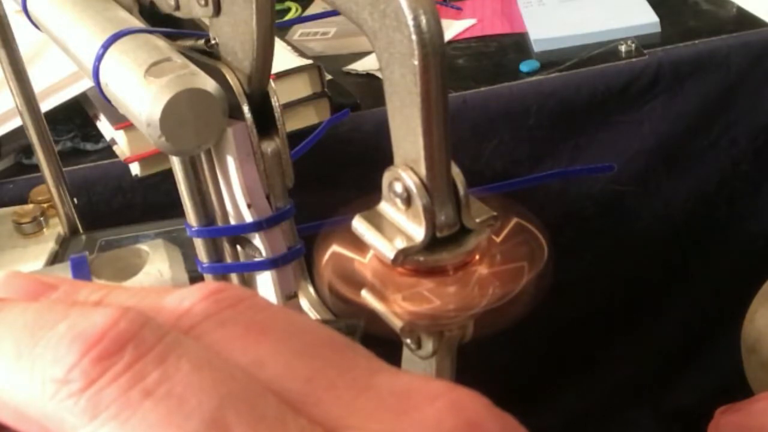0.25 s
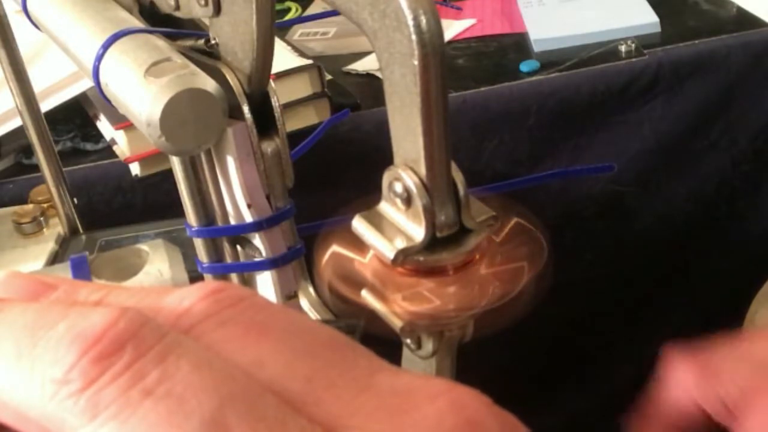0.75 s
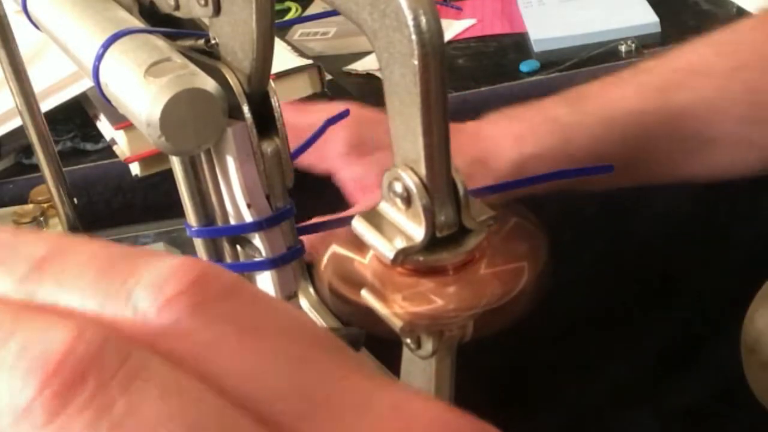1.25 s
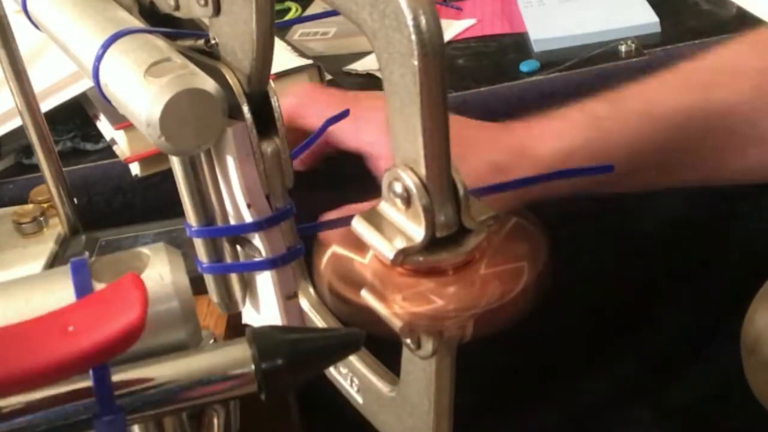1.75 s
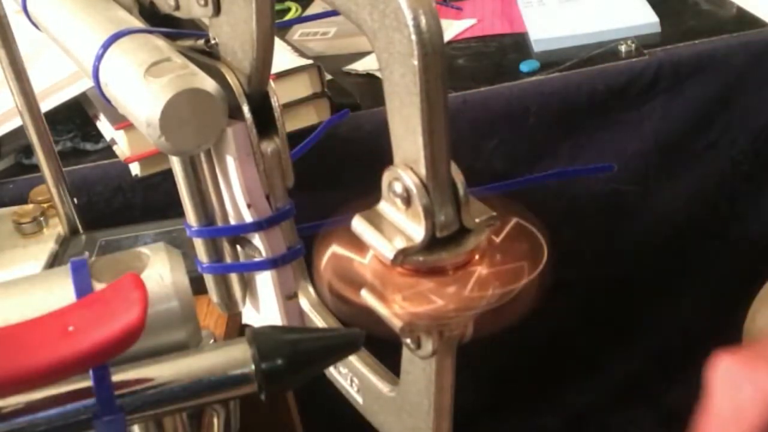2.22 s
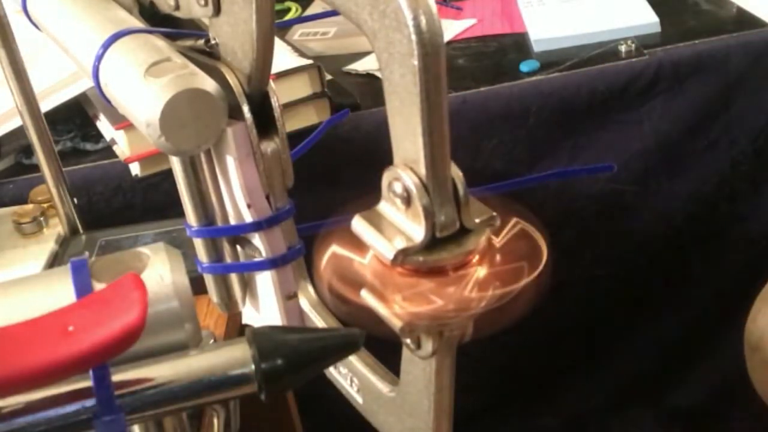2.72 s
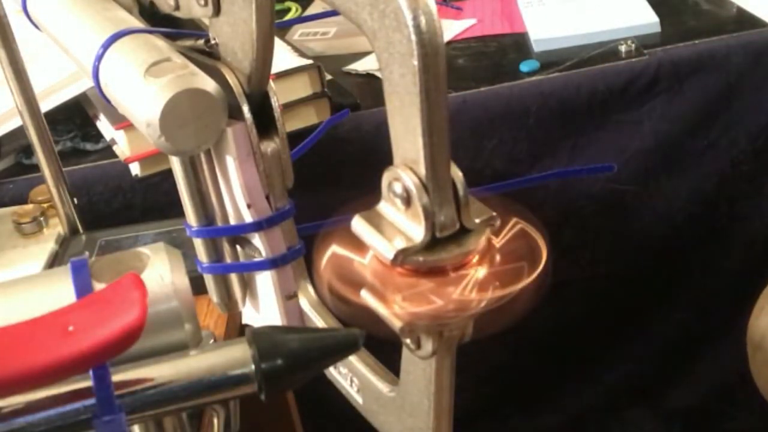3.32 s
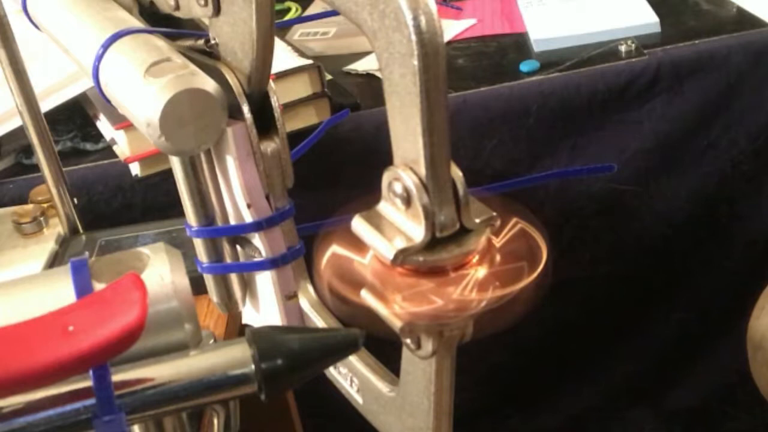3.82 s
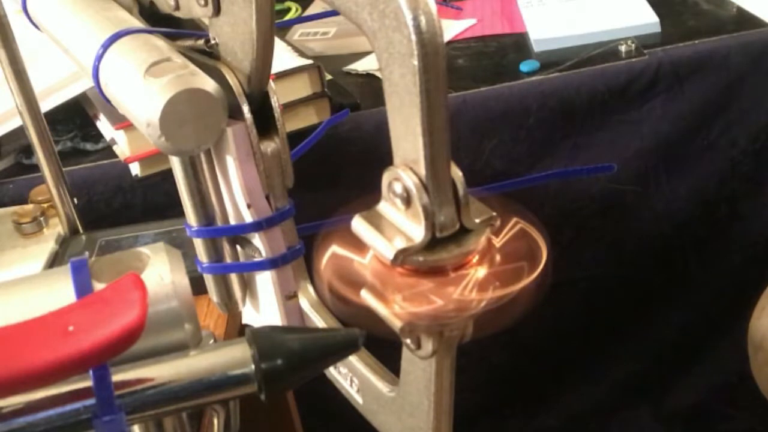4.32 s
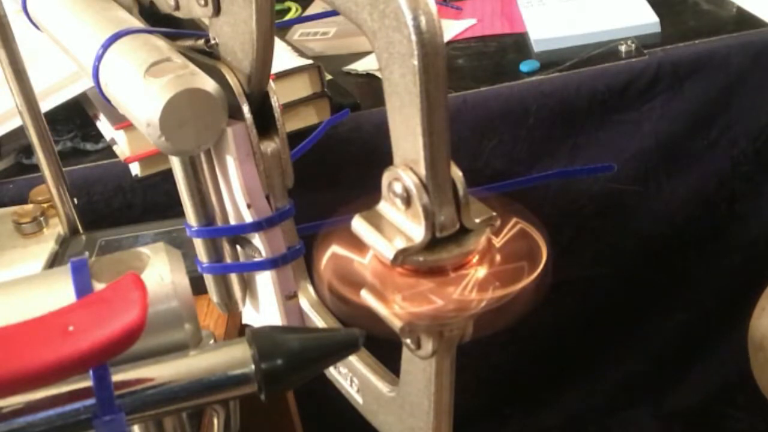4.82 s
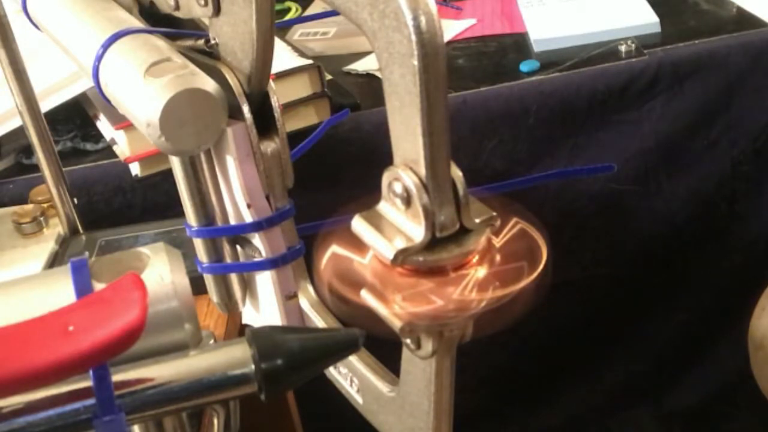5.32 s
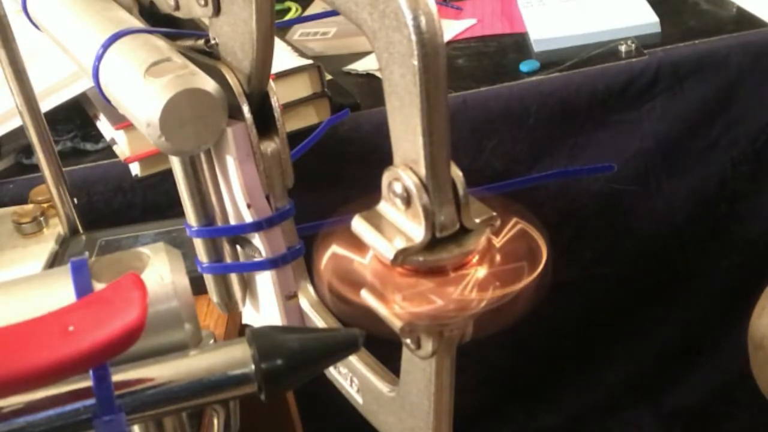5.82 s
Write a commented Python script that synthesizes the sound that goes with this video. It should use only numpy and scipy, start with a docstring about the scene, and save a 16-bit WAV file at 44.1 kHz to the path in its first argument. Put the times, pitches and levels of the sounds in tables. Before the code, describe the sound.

A compressed-air jet roars and buzzes against a small metal spinner, cuts off with a click, and the spinner coasts on humming with thin bearing whistles.

```python
"""A small furnished room: an air gun blows on a two-lobed metal spinner in a clamp, then shuts off; it coasts on.
The lobes chop the jet into a rising buzz over puffing hiss; gusts of spent air thump the microphone.
Coasting, the lobes hum and stir the air, and the ten-ball bearing sings thin falling whistles, squeals and
chatters. Two trigger ticks and a soft low drone follow the jet. The recorder's gain control ducks under
the jet and climbs back when it stops."""
import sys
import numpy as np
from scipy import signal
from scipy.fft import rfft, irfft, next_fast_len
from scipy.io import wavfile
from scipy.ndimage import uniform_filter1d

SR = 44100
rng = np.random.default_rng(int(sys.argv[2]) if len(sys.argv) > 2 else 0)


def wav_out(sig):
    """Save sig, one row per channel (or a flat mono array), as 16-bit PCM at SR to the path in sys.argv[1]."""
    wavfile.write(sys.argv[1], SR, np.round(np.clip(np.atleast_2d(sig).T, -1, 1) * 32767).astype(np.int16))


def linear_from_db(decibels):
    """Turn decibels (scalar or array-like) into linear amplitude factors; 0 gives 1."""
    return 10 ** (np.asarray(decibels, float) / 20)


N = 267246
T = np.arange(N) / SR
TOP_S = 1.18  # moment of top speed


def walk(rate):
    """Random levels held 1 / rate s and slewed twice; spread near 1."""
    hold = int(SR / rate)
    steps = np.repeat(rng.standard_normal(N // hold + 1), hold)
    return np.sqrt(2) * uniform_filter1d(uniform_filter1d(steps, hold), hold)[:N]


def noise(colour, flicker_db, rate):
    """Coloured noise of rms 1 in octave bands whose levels flicker alone."""
    size = next_fast_len(N)
    octave = np.log2(np.maximum(np.fft.rfftfreq(size, 1 / SR), 1))
    hz, db = np.transpose(colour)
    shape_db = np.interp(octave, np.log2(hz), db, left=-80, right=-60)
    spectrum = rfft(rng.standard_normal(size)) * linear_from_db(shape_db)
    out = np.zeros(N)
    for centre in range(int(np.log2(hz[0])), int(np.log2(hz[-1])) + 2):
        band = irfft(spectrum * np.clip(1 - abs(octave - centre), 0, 1), size)[:N]
        out += band * linear_from_db(flicker_db * walk(rate))
    return out / np.std(out)


def room(dry, t60_s, wet_db):
    """A small furnished room: a short tail, duller than the source."""
    t = T[:SR // 2]
    dull = signal.lfilter([1], [1, -.6], rng.standard_normal(len(t)))
    tail = dull * np.exp(-np.log(1000) * t / t60_s) * (t > .004)
    return dry + linear_from_db(wet_db) * signal.fftconvolve(dry, tail / np.linalg.norm(tail))[:N]


def spin():
    """Lobe rate in Hz: the jet drives it up steadily, then drag takes a share each second, a little more at first."""
    start_hz, gain_hz_per_s = 251.3, 20.07
    drag_per_s, early_loss_hz, early_s = .0202, .8, .28
    after = np.maximum(T - TOP_S, 0)
    driven = start_hz + gain_hz_per_s * np.minimum(T, TOP_S)
    return driven * np.exp(-drag_per_s * after) - early_loss_hz * (1 - np.exp(-after / early_s))


def fading(layer):
    """Level in dB of a coasting layer: a slow drift, and one short step about two seconds into the coast."""
    # Each row, by layer: level in dB at top speed, step in dB, drift in dB per s.
    # The step goes down for hum, air, rumble and chatter, up for octave and rustle.
    layers = {"hum": (-45, -2.7, -0.23), "octave": (-69.5, 2.6, -.1), "air": (-57.5, -0.38, -0.77),
              "rustle": (-69.5, .3, -0.84), "rumble": (-61.5, -6.5, -0.45), "chatter": (-74, -10, .3)}
    # The step: its middle in s, its length in s.
    step_time = (3.08, .08)
    db, step_db, drift_db = layers[layer]
    s, length = step_time
    return db + step_db * np.clip((T - s) / length + .5, 0, 1) + drift_db * (T - TOP_S)


def drone():
    """A soft low tone that holds a moment and dies."""
    # The tone: pitch in Hz, peak level in dB, start in s, end in s.
    tone = (111.5, -54, 1.47, 1.92)
    hz, db, start, end = tone
    envelope = np.clip(np.minimum((T - start) / .05, (end - T) / 0.18), 0, 1)
    return linear_from_db(db) * envelope * np.sin(2 * np.pi * hz * T)


def trigger():
    """The trigger snaps back in two dry ticks after the air stops: each a crack and a short ring."""
    # Each row: start in s, level in dB.
    clicks = [(1.298, -46), (1.308, -37)]
    # Ringing modes of the trigger. Each row: pitch in Hz, relative level in dB, t60 in s.
    modes = [(2500, 2, 0.013), (4200, 0, .006), (5800, -1.5, .006)]
    t = T[:SR // 40]
    ring = sum(linear_from_db(db) * np.sin(2 * np.pi * hz * t) * np.exp(-np.log(1000) * t / t60) for hz, db, t60 in modes)
    out = np.zeros(N)
    for s, db in clicks:
        crack = np.diff(uniform_filter1d(rng.standard_normal(len(t) + 1), size=3)) * np.exp(-t / 0.0011)
        start = int(s * SR)
        out[start:start + len(t)] += linear_from_db(db) * (0.99 * crack - ring / abs(ring).max())
    return out


def gusts():
    """Each gust of spent air shoves the microphone in, lets it swing back, and flutters roughly on it meanwhile."""
    # Each row: centre in s, level in dB, thump pitch in Hz.
    thumps = [(.27, -18.5, 96), (0.358, -20, 65), (0.652, -14.5, 94), (0.692, -16.5, 110), (.72, -19, 67),
              (.79, -24, 75), (0.926, -18.5, 55), (1.105, -13.5, 79.4)]
    flutter = noise([(60, -29), (200, 6), (500, -5), (1200, -27)], 0, 25)
    out = np.zeros(N)
    for s, db, hz in thumps:
        swing = linear_from_db(-5.5) * flutter - np.sin(2 * np.pi * hz * (T - s))
        out += linear_from_db(db) * swing * np.exp(-(1.57 * hz * (T - s)) ** 2)
    return out


def coast(turn):
    """The lobes push air at their passing rate and leave turbulence; the bearing rustles; the clamp rumbles."""
    # Noise colours of the eddies, rustle and rumble. Each row: frequency in Hz, relative level in dB per Hz.
    air_colour = [(60, -19), (150, 3), (300, 5), (550, 1.5), (950, 0.5), (1500, -4.5), (2200, -10),
                  (3300, -15.5), (5000, -39), (9000, -48)]
    rustle_colour = [(2000, -24), (4000, 3), (5000, -5), (6200, -2.5), (8700, -8), (10500, -10.5),
                     (11500, -6.5), (15700, -11)]
    rumble_colour = [(25, -13), (50, -9), (90, -1.5), (130, -7), (200, -12.5), (300, -4)]
    hum = linear_from_db(fading("hum") + 0.5 * walk(25.29)) * np.cos(turn + 0.07 * walk(30))
    octave_db = fading("octave")
    upper = np.zeros(N)
    for k, db in enumerate((0.0, -10.5, -11.0, -13.0), 2):  # harmonics 2 to 5 of the lobe rate
        upper += linear_from_db(octave_db + db + 1.8 * walk(15)) * np.cos(k * turn + 1.54)
    eddies = linear_from_db(fading("air") + 0.85 * walk(150)) * noise(air_colour, 0.32, 14)
    rustle = linear_from_db(fading("rustle")) * noise(rustle_colour, 1.7, 5.32)
    rumble = linear_from_db(fading("rumble")) * noise(rumble_colour, 1.8, 8.8)
    return np.sqrt(2) * (hum + upper) + eddies + rustle + rumble


def bearing(turn, lobe_hz):
    """Ten balls on wavy races sing one cage turn above and below each multiple of the ball rate, squeal and chatter."""
    # Resonances of spinner and clamp that a whistle swells through as it falls.
    # Each row: centre in Hz, width in Hz, basic whistle level at the centre in dB rms.
    resonances = [(2140, 43, -78.5), (2415, 130, -83), (2880, 46, -82), (3085, 54, -80), (3813, 134, -80),
                  (4062, 73, -76.5), (4385, 63, -84), (4490, 110, -82), (5270, 110, -83), (5900, 150, -84),
                  (6108, 93, -74), (6360, 100, -78.5), (11170, 140, -81), (11550, 210, -81),
                  (11930, 90, -83), (12110, 90, -83), (12290, 90, -86), (12500, 90, -83), (12770, 140, -80),
                  (13400, 110, -82), (13600, 160, -81), (14840, 150, -85)]
    # Whistles stronger or weaker than the rest: multiple of cage rate, with its offset in dB.
    waviness = {39: 2., 41: -5, 61: -4., 79: 3, 81: -3.5, 139: -6, 149: -1, 169: -5, 179: -7, 191: -3}
    # Squeals, a tone with a partner one lobe rate below and above. Each row: centre in s, length in s,
    # multiple of cage rate, then basic levels in dB rms of the tone below, the centre and the tone above.
    squeals = [(2.19, .22, 141.44, -72, -84, -70), (4.26, .47, 100, -77, -76, -74),
               (5.57, .2, 151.55, -79, -88, -82)]
    # Bursts of ball chatter. Each row: centre in s, rise above the rest in dB, length in s.
    bursts = [(1.56, 4.5, 0.091), (1.866, 6.5, .05), (2.16, 4.5, 0.12)]
    # Chatter colour. Each row: frequency in Hz, relative level in dB per Hz.
    chatter_colour = [(7000, -18), (10500, -13), (11200, 0), (12800, -4), (14000, -15), (15700, -9)]
    cage_per_lobe = .2956  # cage turns per lobe passing
    cage = cage_per_lobe * turn
    step = 256  # samples between whistle level updates
    waver = np.array([walk(20) for _ in range(4)])
    wander = iter(np.array_split(walk(6 * step), step))
    hz, width, db = np.transpose(resonances)[:, :, None]
    out = np.zeros(N)
    for ball in range(30, 210, 10):
        for side in (-1, 0, 1):
            multiple = ball + side
            line_hz = multiple * cage_per_lobe * lobe_hz[::step]
            swell = np.sum(np.sqrt(2) * linear_from_db(db) / (1 + (2 * (line_hz - hz) / width) ** 2) ** 2, axis=0)
            # faint and wandering between resonances, weaker on the ball multiples themselves
            faint = np.resize(linear_from_db(-93.5 + 5.4 * next(wander)), len(swell))
            size = swell * linear_from_db(waviness.get(multiple, 0) + 2.5 * waver[side, ::step]) + faint
            size = np.interp(T, T[::step], size * linear_from_db(-8 * (side == 0)))
            out += size * np.cos(multiple * cage + 0.67 * waver[side + 1])
    for s, length, multiple, *levels in squeals:
        tones = np.zeros(N)
        for side, level in enumerate(levels, -1):
            tones += linear_from_db(level) * np.cos(multiple * cage + side * turn + .4 * waver[side])
        envelope = np.exp(-abs(1.6 * (T - s) / length) ** 1.8)
        out += np.sqrt(2) * tones * linear_from_db(1.7 * waver[2]) * envelope
    # the load meets the balls once a cage turn against the fixed race, and once against the spinning one
    throb = linear_from_db(3 * np.cos(cage) + 1.2 * np.cos(2 * cage) + 1.5 * np.cos(turn / 2 - cage))
    bursts_db = sum(rise * np.exp(-((T - s) / length) ** 2) for s, rise, length in bursts)
    chatter = linear_from_db(fading("chatter") + bursts_db) * noise(chatter_colour, 1.2, 15) * throb
    return out * throb ** 0.19 + chatter


def jet(turn):
    """Each passing lobe cuts the jet: a buzz on the lobe rate and hiss that puffs once a lobe."""
    # Noise colours of the hiss and the low buffeting. Each row: frequency in Hz, relative level in dB per Hz.
    hiss_colour = [(150, -21.5), (400, -26), (900, -20), (2000, -21.5), (3100, -17.5), (5000, -18.5),
                   (7500, -19.5), (9500, -14.5), (10500, -19), (12500, -14), (15700, -16)]
    buffet_colour = [(25, -17), (60, 2.5), (120, -4.5), (250, -8.5), (500, -15), (1000, -50)]
    # Harmonics of the buzz. Each row: multiple of lobe rate, relative level in dB.
    harmonics = [(1, 5.5), (2, 0.5), (3, -1), (4, 3), (5, -12), (6, -0.5), (7, -3.5), (9, -8), (10, -22),
                 (11, -11), (12, -8)]
    # valve: moment it starts to close, time to lose the first dB
    shut_s, close_s = 1.162, 0.0074
    wobble = .03 * walk(80)
    buzz = np.zeros(N)
    for k, db in harmonics:
        buzz += linear_from_db(db + 1.87 * walk(24.64)) * np.cos(round(k) * (turn + wobble) + 0.1992 * k * k)
    puff = 1 + .25 * np.cos(turn + .3) + .07 * np.cos(2 * turn)
    hiss = noise(hiss_colour, 0.84, 12.1) * puff * linear_from_db(0.49 * walk(400))
    flow = linear_from_db(-12.5 - np.clip((T - shut_s) / close_s, 0, 5) ** 3)
    buffet = linear_from_db(-17.0) * noise(buffet_colour, 3.3, 25)
    return room(flow * hiss, 0.15, -13.0) + flow * (linear_from_db(-13.5) * buzz + buffet)


def scene():
    """Gun and spinner in the room."""
    lobe_hz = spin()
    turn = 2 * np.pi * np.cumsum(lobe_hz) / SR  # phase in radians, one cycle a lobe
    mix = drone() + trigger() + gusts() + coast(turn) + bearing(turn, lobe_hz) + jet(turn)
    return mix[None]


def gain_control(sound):
    """Turns loud sound down at once and recovers at a steady rate."""
    knee_db, share, recover_db_per_s = -40, .5, 33
    loud_db = 10 * np.log10(uniform_filter1d(sound[0] ** 2, size=2048) + 1e-12)
    cut_db = share * np.maximum(loud_db - knee_db, 0)
    # a running maximum on a rising ramp lets the cut fall no faster than the ramp
    ramp_db = recover_db_per_s * T
    cut_db = np.maximum.accumulate(cut_db + ramp_db) - ramp_db
    return sound * linear_from_db(-uniform_filter1d(cut_db, size=1024))


def top_cut(x):
    """Nothing passes above the cut-off."""
    return signal.sosfilt(signal.butter(12, 17080, fs=SR, output="sos"), x)


def record(dry):
    """The microphone drops the deepest bass, then the recorder's gain control rides the level."""
    bass_cut = signal.butter(3, 40, "high", fs=SR, output="sos")
    heard = signal.sosfilt(bass_cut, dry)
    return top_cut(gain_control(heard))


dry = scene()
out = record(dry)
wav_out(out)
```